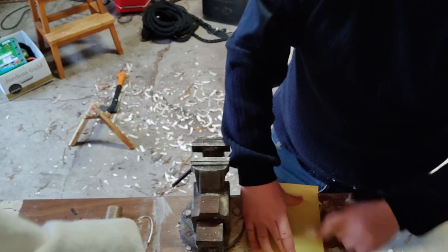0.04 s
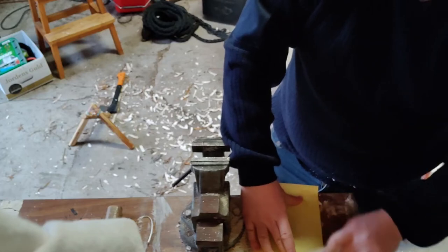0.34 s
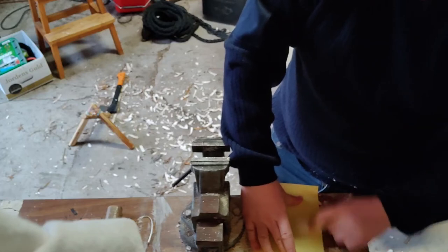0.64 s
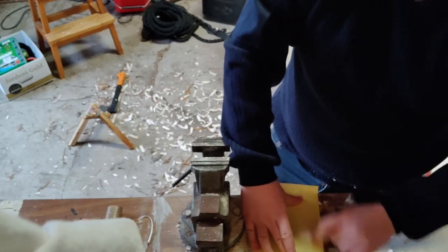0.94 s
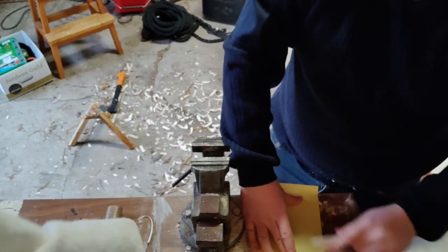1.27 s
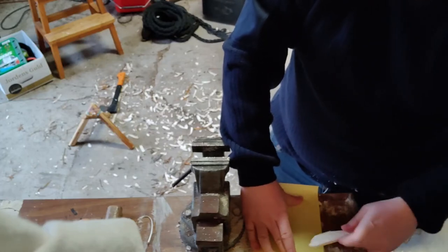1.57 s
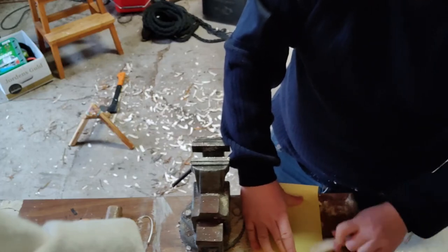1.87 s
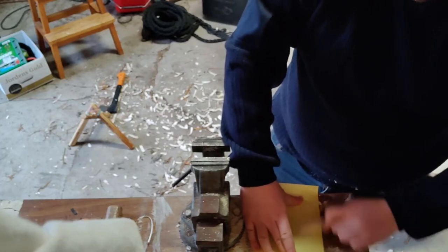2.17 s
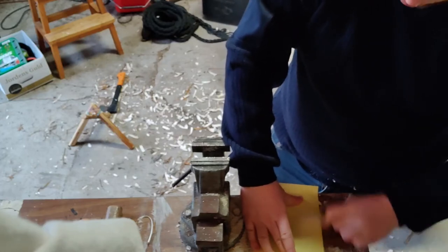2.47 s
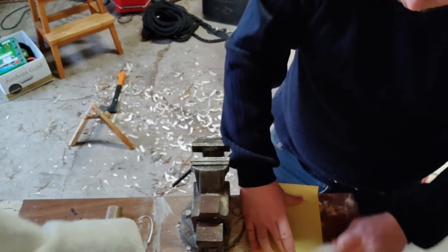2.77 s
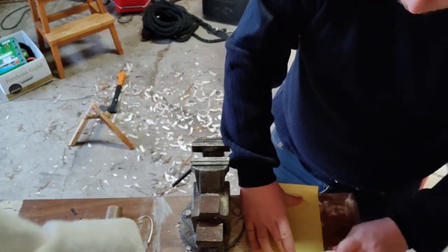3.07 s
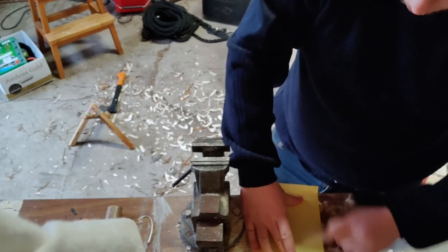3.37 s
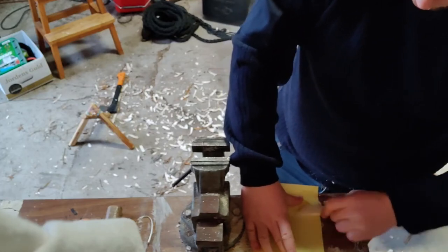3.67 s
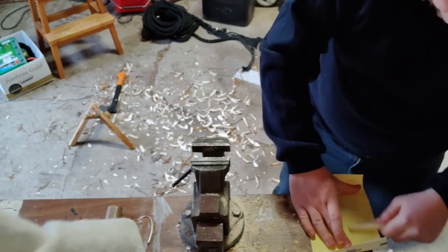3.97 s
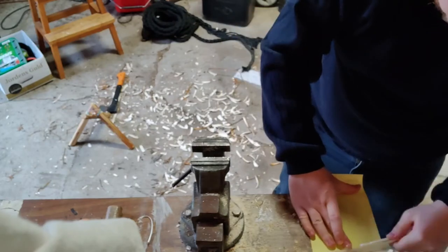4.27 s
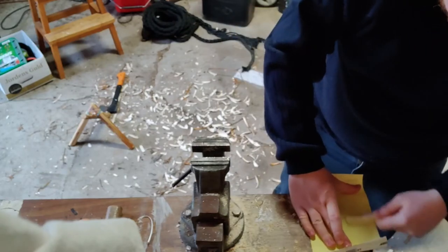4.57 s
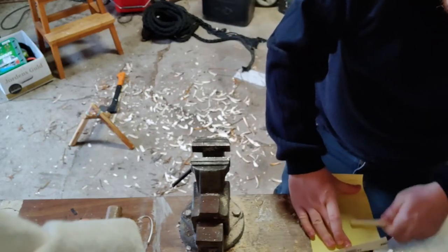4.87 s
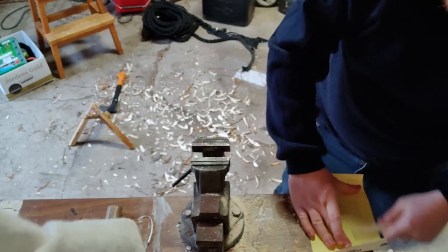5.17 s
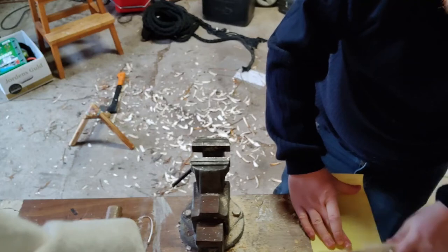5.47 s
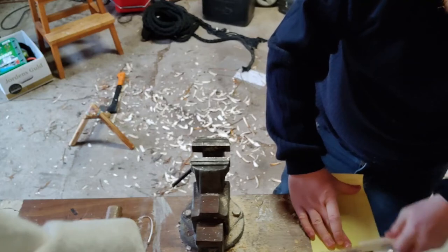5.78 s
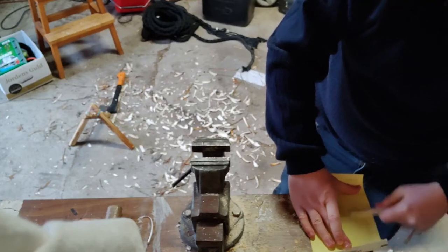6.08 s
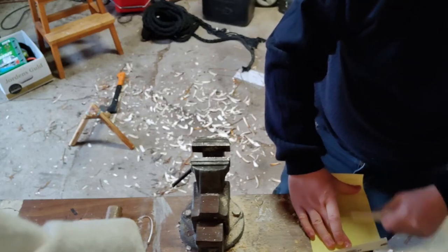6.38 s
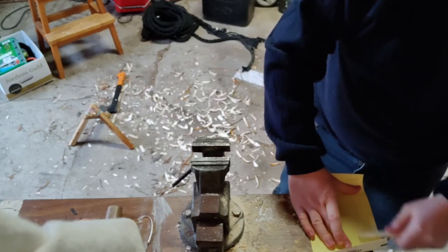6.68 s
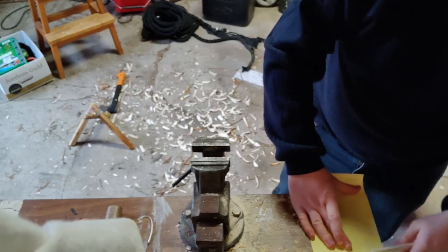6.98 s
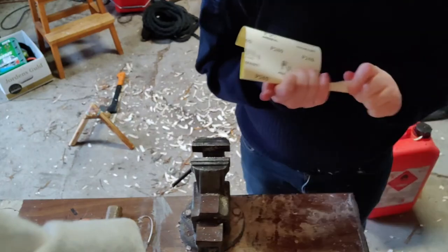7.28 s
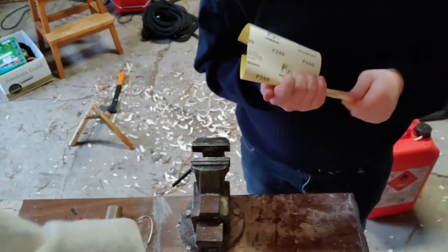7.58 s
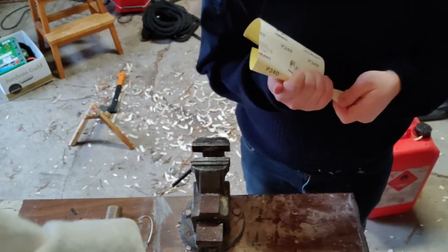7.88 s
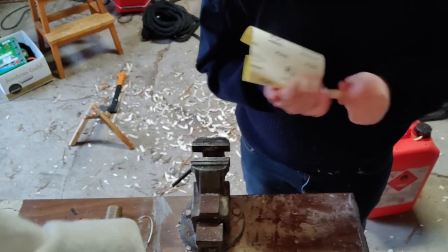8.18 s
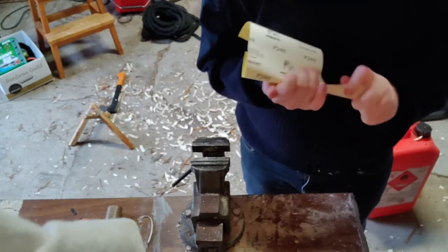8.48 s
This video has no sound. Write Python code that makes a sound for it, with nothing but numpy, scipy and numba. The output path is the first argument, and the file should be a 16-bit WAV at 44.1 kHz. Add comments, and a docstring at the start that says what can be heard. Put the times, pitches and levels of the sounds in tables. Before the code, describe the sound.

Fast, scratchy strokes of a thin wood strip on fine sandpaper, pausing once, then turning raspier, in a small workshop.

```python
"""A bright, scratchy hiss, about eight strokes a second: a thin wood strip sanded by hand in a small workshop.
It is rubbed flat on a sheet on the bench, turned over, run on its edge, then worked in the folded sheet.
Grit ticks merge into the hiss; the strip rasps, snags and rings hollow notes; bench or fist drums below.
The room answers briefly, over faint still air and a hum."""
import sys
import numpy as np
from scipy import signal
from scipy.fft import rfft, irfft
from scipy.io import wavfile
from scipy.ndimage import uniform_filter1d, minimum_filter1d, map_coordinates
from numba import njit

SR = 44100
rng = np.random.default_rng(int(sys.argv[2]) if len(sys.argv) > 2 else 0)


def log_audio(samples):
    """Write samples as a 16-bit WAV file to the path given in sys.argv[1]."""
    # one column per channel
    frames = np.atleast_2d(samples).T
    # limit to full scale, then quantise
    limited = np.clip(frames, -1, 1)
    pcm = np.round(limited * 32767).astype(np.int16)
    wavfile.write(sys.argv[1], SR, pcm)


N = 384993
TIME_S = np.arange(N) / SR
FREQ_HZ = np.maximum(np.fft.rfftfreq(N, 1 / SR), 1)
EDGE_FROM_S, FIST_FROM_S, STROKES_END_S = 3.87, 7.225, 8.745


# Strokes, each row lasting until the next: t/s, hiss level/dB, rasp level/dB, lean (rise over a stroke)/dB
STROKES = [ (-0.013, -27, -49.5, 8.5), (0.122, -25, -48.5, 0), (0.459, -27.5, -50.5, 3.5),
           (1.164, -26.5, -52.5, 0.5), (1.292, -48, -63.5, -42), (1.397, -100, -95, 0),
           (1.56, -70.5, -82, 0), (1.625, -92, -94, -4), (1.835, -73, -79, -16), (1.984, -31, -43, 3),
           (2.061, -63.5, -70, -14), (2.11, -28, -42.5, 11), (2.214, -26, -43, -8), (2.343, -28, -46, -6),
           (2.835, -25, -46.5, 3), (3.802, -28.5, -45.5, -3.5), (4.043, -43, -46, -12),
           (4.084, -22, -46, 12), (4.177, -25, -40, 10), (4.297, -23, -36, -1), (4.42, -22.5, -40, 1),
           (4.535, -28.5, -40, -5), (4.66, -25, -41, -12), (4.775, -29, -41, -6), (4.911, -26.5, -42, -1),
           (5.017, -26.5, -38.5, 3), (5.138, -32.5, -43.5, -5), (5.264, -26, -42, -1),
           (5.384, -26, -40, 1.5), (5.506, -25, -40.5, 16), (5.62, -26.5, -37, 9), (5.744, -29, -42.5, 4),
           (5.887, -29.5, -43.5, -8), (6.009, -26.5, -43.5, 4), (6.133, -23.5, -38, -1),
           (6.259, -23, -37, -2), (6.37, -24.5, -39, -2), (6.496, -23.5, -38, -13.5),
           (6.627, -28.5, -41, -8), (6.742, -29, -40, -19), (6.882, -29, -45, 2), (6.985, -24.5, -41, 19.5),
           (7.101, -26.5, -39.5, 16), (7.228, -30, -40, -16), (7.299, -33.5, -39.5, 8),
           (7.473, -33, -41, 0), (7.634, -33, -43, -11), (7.72, -31, -41, 5), (7.824, -36, -48.5, 8),
           (7.923, -38, -45.5, -1), (8.017, -39.5, -50, 34), (8.094, -31.5, -41, 5),
           (8.205, -32.5, -45, -3), (8.284, -32, -42, 12), (8.394, -32, -42, 3), (8.469, -31, -42, -7),
           (8.572, -34, -42.5, -8), (8.665, -39.5, -47.5, -20)]


def hand(pace_s=0.119, run_over_s=0.3, swing_s=0.0044, push_db=1.5, scatter_db=1.1):
    """Stroke timing and levels per sample; long rows split into runs, pushes shorter and stronger."""
    strokes = []
    ends = [row[0] for row in STROKES[1:]] + [STROKES_END_S]
    for (start, hiss_db, rasp_db, lean_db), end in zip(STROKES, ends):
        count = round((end - start) / pace_s) if end - start > run_over_s else 1
        for k in range(count):
            onset_s = start + (end - start) * k / count - swing_s * (k % 2)
            accent_db = (count > 1) * (push_db * (-1) ** k + scatter_db * rng.standard_normal())
            strokes.append((onset_s, hiss_db + accent_db, rasp_db + accent_db, lean_db))
    starts, hiss_db, rasp_db, lean_db = np.transpose(strokes)
    number = np.maximum(np.searchsorted(starts, TIME_S) - 1, 0)
    since_s = np.abs(TIME_S - starts[number])
    until_s = np.abs(np.append(starts[1:], STROKES_END_S)[number] - TIME_S)
    ramp_db = lean_db[number] * (since_s / (since_s + until_s) - 0.5)
    pressure_db = by_grip(0.3, 0.6, 1.2) * walk(55)
    return dict(number=number, since_s=since_s, until_s=until_s,
                hiss_db=hiss_db[number] + ramp_db + pressure_db,
                rasp_db=rasp_db[number] + 0.7 * ramp_db + pressure_db)


def stroke_gain(motion, level_db, attack_s, release_s, creep):
    """Grit bites, holds and lets go as the hand slows; some creep remains at the turn."""
    bite = np.sin(np.pi / 2 * np.minimum(motion["since_s"] / attack_s, 1)) ** 2
    release = np.minimum(motion["until_s"] / release_s, 1)
    return uniform_filter1d(np.hypot(bite * release, creep) * undb(level_db), size=130)


# Snags: t/s, hiss level/dB, rasp level/dB
SNAGS = [(0.182, -22.5, -57), (0.66, -40, -41), (1.832, -63, -74), (1.988, -28.5, -58), (2.227, -24, -51),
         (3.965, -36, -35), (3.986, -25.5, -36), (4.009, -31, -35), (4.241, -19, -40), (4.318, -19.5, -49),
         (4.43, -38, -54), (4.675, -16, -57), (4.851, -18, -56), (4.921, -22.5, -57), (6.149, -20, -55),
         (6.272, -25, -39), (6.323, -10.5, -40), (6.388, -24, -57), (6.516, -34, -40), (6.637, -39, -38),
         (7.038, -23, -54), (7.173, -15, -36), (7.337, -25, -26.5), (7.35, -40, -24), (7.376, -21.5, -18),
         (7.521, -21, -20), (7.532, -30, -24.5), (7.545, -25.5, -23.5), (7.912, -31.5, -39.5),
         (8.273, -25, -32.5), (8.432, -33, -29), (8.447, -32, -26)]


def snag_gain(layer):
    """Wood catches on the grit and breaks free: millisecond bursts in the "hiss" or "rasp" layer."""
    power = np.zeros(N)
    for start_s, hiss_db, rasp_db in SNAGS:
        span = slice(int(start_s * SR), int((start_s + 0.1) * SR))
        rise_s = 0.0048 if start_s < FIST_FROM_S else 0.0046
        rises = np.maximum(TIME_S[span] - start_s, 0) / rise_s
        peak = undb(hiss_db if layer == "hiss" else rasp_db)
        power[span] += (peak * rises * np.exp(1 - rises)) ** 2
    return np.sqrt(power)


def grit(ticks_per_s, spread_db, chatter_db, chatter_hz, slip_size, slips_per_s=70, slip_s=0.004):
    """Grains tear fibres: dense ticks, a few large, bunched by stick and slip."""
    hits = rng.random(N) < ticks_per_s / SR
    sizes = undb(spread_db * np.minimum(rng.exponential(size=N), 8))
    kicks = (rng.random(N) < slips_per_s / SR) * rng.random(N)
    slips = signal.lfilter([1], [1, -np.exp(-1 / (slip_s * SR))], kicks)
    ticks = hits * sizes * rng.choice([-1, 1], N)
    chatter = undb(chatter_db * walk(chatter_hz))
    return unit_rms(ticks * chatter * (1 + slip_size * slips))


# Hiss spectrum per grip, as heard through the phone microphone, which resonates near 9.5 kHz:
# f/Hz, relative level/dB
FLAT_HISS = [(2650, -47), (4500, -26.5), (5460, -24.5), (7170, -10), (7910, -8), (8880, -1.5), (9500, 3),
             (10600, -6), (11900, -6.5), (14100, -16.5), (15100, -14), (15700, -19)]
EDGE_HISS = [(2650, -51), (4500, -23.5), (5810, -22.5), (7050, -9), (7960, -9.5), (8970, -2), (9550, 2),
             (11400, -12), (15700, -24.5)]
FIST_HISS = [(2650, -30), (4500, -16.5), (5600, -28), (7300, -15.5), (8300, -10), (9550, 1), (10200, -3.5),
             (11200, -14.5), (15700, -20)]


def grit_hiss(motion):
    """Ticks merge into a bright hiss; on the edge fewer grains carry the load, so it crackles."""
    flat = grit(ticks_per_s=16000, spread_db=2.0, chatter_db=0.4, chatter_hz=750, slip_size=0.71)
    edge = grit(ticks_per_s=9000, spread_db=1.5, chatter_db=1.23, chatter_hz=160, slip_size=0.38)
    fist = grit(ticks_per_s=12000, spread_db=2.5, chatter_db=0.8, chatter_hz=1300, slip_size=0.85)
    ticks = by_grip(shaped(flat, FLAT_HISS), shaped(edge, EDGE_HISS), shaped(fist, FIST_HISS))
    # Brightest in mid-stroke; each edge stroke meets the grit at its own angle.
    treble = signal.sosfiltfilt(signal.butter(3, 10700, "high", fs=SR, output="sos"), ticks)
    angle_db = 1.9 * rng.standard_normal(motion["number"].max() + 1)[motion["number"]]
    treble_db = by_grip(1.0, 1.5 + angle_db, -0.92)
    treble_gain = stroke_gain(motion, treble_db, attack_s=0.011, release_s=0.037, creep=0.25)
    friction = stroke_gain(motion, motion["hiss_db"], attack_s=by_grip(0.026, 0.029, 0.022),
                           release_s=by_grip(0.038, 0.054, 0.036), creep=by_grip(0.17, 0.15, 0.29))
    return (ticks + (treble_gain - 1) * treble) * np.hypot(friction, snag_gain("hiss"))


# Broad wood and paper spectrum per grip: f/Hz, relative level/dB
FLAT_RASP = [(240, -34.5), (420, -12.5), (650, -8.5), (850, -10), (1800, -7.5), (2700, -4.5), (5000, -6),
             (9000, -68.5)]
EDGE_RASP = [(240, -48), (400, -3.5), (1250, -1.5), (2700, -8), (3200, -3), (5000, -13), (9000, -80)]
FIST_RASP = [(200, -45), (400, -9), (760, -7.5), (1050, -9.5), (1320, -1.5), (2080, -9.5), (2600, -5.5),
             (3500, -7.5), (5000, -29.5), (9000, -63)]
# Strip resonances per grip: f/Hz, width/Hz, relative level/dB
FLAT_MODES = [(1470, 320, -8.5), (2253, 220, 0.5), (2707, 110, 5)]
EDGE_MODES = [(650, 59, 1), (1901, 50, 2.5), (3040, 97, -0.5)]
FIST_MODES = [(1370, 93, 0.5), (1970, 25, -2.5), (2460, 230, 2)]


def wood_rasp(motion):
    """Strokes and snags drive the woody midrange; in the fold the strip ratchets in fewer jerks."""
    rub = grit(ticks_per_s=5000, spread_db=0.0, chatter_db=0.74, chatter_hz=120, slip_size=0.83)
    ratchet = grit(ticks_per_s=3600, spread_db=1.5, chatter_db=1.8, chatter_hz=150, slip_size=0.85)
    flat = strip_body(rub, FLAT_RASP, FLAT_MODES, ring_db=-0.5, drift=0.01)
    edge = strip_body(rub, EDGE_RASP, EDGE_MODES, ring_db=1.0, drift=0.03)
    fist = strip_body(ratchet, FIST_RASP, FIST_MODES, ring_db=-1.5, drift=0.015)
    friction = stroke_gain(motion, motion["rasp_db"], attack_s=by_grip(0.018, 0.031, 0.021),
                           release_s=by_grip(0.024, 0.046, 0.038), creep=by_grip(0.29, 0.27, 0.26))
    return by_grip(flat, edge, fist) * np.hypot(friction, snag_gain("rasp"))


def strip_body(force, spectrum, modes, ring_db, drift):
    """Strip and paper radiate broadly; a few resonances stand out and wander as the fingers shift."""
    mode_power = sum(undb(db) ** 2 / (1 + (2 * (FREQ_HZ - hz) / width_hz) ** 2) ** 2
                     for hz, width_hz, db in modes)
    wood = causal_filter(force, np.sqrt(spectrum_gain(spectrum) ** 2 + undb(ring_db) ** 2 * mode_power))
    read_index = np.cumsum(1 + drift * walk(14))
    return unit_rms(map_coordinates(wood, [read_index], order=3, mode="mirror"))


# Hollow notes where the edge digs in: centre t/s, f/Hz, level/dB
HOLLOW_NOTES = [(.665, 1650, -48), (1.245, 620, -55), (3.91, 2850, -41.5), (3.985, 700, -53),
                (4.26, 1660, -40.5), (4.36, 1120, -38.5), (4.485, 1410, -36), (4.59, 1105, -36),
                (5.061, 1150, -36), (5.57, 730, -38.5), (5.69, 800, -37), (5.784, 724, -36),
                (6.312, 1000, -37.5), (6.44, 690, -37), (6.655, 1104, -42.5)]


def hollow_notes(motion, half_length_s=0.03, glide_oct_per_s=8.1, q=1.84):
    """Judder rings a strip resonance; it glides with the contact, up on one stroke, down on the next."""
    notes = np.array(HOLLOW_NOTES)
    nearest = np.searchsorted((notes[1:, 0] + notes[:-1, 0]) / 2, TIME_S)
    centre_s, centre_hz, level_db = notes[nearest].T
    offset_s = np.clip(TIME_S - centre_s, -4 * half_length_s, 4 * half_length_s)
    direction = 1 - 2 * (motion["number"] % 2)
    pitch_hz = centre_hz * 2 ** (glide_oct_per_s * direction * offset_s)
    judder = grit(ticks_per_s=3000, spread_db=3.0, chatter_db=1.5, chatter_hz=100, slip_size=0.5)
    first_pass = moving_bandpass(judder, pitch_hz, q) * np.sqrt(pitch_hz)
    ring = unit_rms(moving_bandpass(first_pass, pitch_hz, q))
    return ring * undb(level_db) * np.exp(-(offset_s / half_length_s) ** 2)


# Drumming spectra of bench and fist: f/Hz, relative level/dB
BENCH_DRUM = [(30, -42), (60, -27.5), (95, -7.5), (150, -4), (200, -4), (245, 3.5), (330, 0.5), (420, -8),
              (560, -13), (900, -56.5)]
FIST_DRUM = [(40, -38), (110, -25), (220, -10), (330, 2), (430, -3.5), (560, -11), (900, -65)]
# Drumming contour, added to the rasp level: t/s, relative level/dB
DRUM_CONTOUR = [(0, -11), (1.9, -6), (2.15, -18), (2.5, -9.5), (3.6, -5.5), (4.0, -10), (4.25, -10),
                (4.45, -11), (4.78, -6), (5.05, -16), (5.65, -4), (5.85, -8.5), (6.2, -5.5), (6.85, -9.5),
                (7.15, -9.5), (7.35, -15), (8.6, -10)]


def drumming(motion):
    """Uneven friction drums on the bench or in the cupped fist."""
    rub = grit(ticks_per_s=1500, spread_db=2.0, chatter_db=by_grip(2.26, 4.75, 4.1),
               chatter_hz=60, slip_size=0.9)
    bench = undb(-1.5) * shaped(rub, BENCH_DRUM)
    fist = undb(-1.0) * shaped(rub, FIST_DRUM)
    drum_db = motion["rasp_db"] + np.interp(TIME_S, *np.transpose(DRUM_CONTOUR))
    friction = stroke_gain(motion, drum_db, attack_s=0.023, release_s=0.04, creep=0.28)
    return by_grip(bench, bench, fist) * np.hypot(friction, undb(-14) * snag_gain("rasp"))


# Knocks on the bench: t/s, peak level/dB, f/Hz
BUMPS = [(2.018, -37, 280), (4.243, -33, 239), (4.744, -34.5, 310), (4.765, -35, 243), (5.685, -32, 344),
         (6.278, -33, 233), (6.519, -29, 224), (7.168, -29.5, 258)]


def bench_bumps(rise_s=0.0037, t60_s=0.057):
    """A soft knock of the strip rings one low note of the bench top."""
    out = np.zeros(N)
    age_s = np.arange(SR // 4) / SR
    envelope = (1 - np.exp(-age_s / rise_s)) * undb(-60 * age_s / t60_s)
    for start_s, peak_db, hz in BUMPS:
        ring = envelope * np.sin(2 * np.pi * hz * age_s)
        start = int(start_s * SR)
        out[start:start + len(ring)] += undb(peak_db) * ring / np.abs(ring).max()
    return out


# Spectra of the shaking bench and its rocking frame: f/Hz, relative level/dB
BENCH_SHAKE = [(25, -33.5), (50, -21.5), (75, -3.5), (96, -0.5), (130, -9), (200, -11.5), (400, -32)]
FRAME_ROCK = [(20, -6), (50, -5), (110, -9), (300, -43)]


def bench_rumble(motion):
    """The working arm shakes the bench and, mainly with the strip flat, rocks the heavy frame."""
    effort = np.tanh(uniform_filter1d(undb(motion["hiss_db"]), size=4000) / undb(-34))
    shake = undb(by_grip(-62, -64, -65)) * shaped(rng.standard_normal(N), BENCH_SHAKE)
    rock = undb(by_grip(-72.5, -90, -94)) * shaped(rng.standard_normal(N), FRAME_ROCK)
    return effort * (shake + rock)


def room_echo(x, t60_s, first_s):
    """A cluttered workshop: scattered early echoes thicken into a short tail."""
    age_s = np.arange(SR // 2) / SR
    echoes = rng.standard_normal(len(age_s)) * (rng.random(len(age_s)) < 0.03 + 10 * age_s)
    response = echoes * (age_s > first_s) * undb(-60 * age_s / t60_s)
    return signal.fftconvolve(x, response / np.linalg.norm(response))[:N]


# Still room spectrum: f/Hz, relative level/dB
STILL_ROOM = [(15, -45), (25, -17), (106, -6), (335, -12.5), (2780, -28.5), (5280, -37.5), (9270, -29),
              (15000, -35)]


def room_tone(air_db=-78.5, hum_db=-82, hum_hz=98):
    """Steady faint noise and a wavering hum."""
    air = undb(air_db) * shaped(rng.standard_normal(N), STILL_ROOM)
    hum = undb(hum_db + 2 * walk(6)) * unit_rms(np.sin(2 * np.pi * hum_hz * TIME_S))
    return air + hum


def by_grip(flat, edge, fist):
    """Per sample, the value for the current grip."""
    return np.where(TIME_S < EDGE_FROM_S, flat, np.where(TIME_S < FIST_FROM_S, edge, fist))


def undb(db):
    """Decibels to gain."""
    return 10 ** (np.asarray(db) / 20)


def unit_rms(x):
    """Scale to rms 1."""
    return x / np.sqrt(np.mean(x ** 2))


def walk(rate_hz):
    """Random line of rms 1, with rate_hz knots a second."""
    knots = rng.standard_normal(N // 20)
    return unit_rms(np.interp(TIME_S * rate_hz, np.arange(len(knots)), knots))


def spectrum_gain(spectrum):
    """Gain per FFT bin from (f/Hz, level/dB) points."""
    hz, db = np.transpose(spectrum)
    return undb(np.interp(np.log(FREQ_HZ), np.log(hz), db))


def causal_filter(x, gain):
    """Minimum-phase filter: each tick rings after it is struck."""
    cepstrum = irfft(np.log(gain + 1e-5), N)
    cepstrum[1:N // 2] *= 2
    cepstrum[N // 2:] = 0
    response = irfft(np.exp(rfft(cepstrum)), N)[:SR // 10]
    return signal.fftconvolve(x, response)[:N]


def shaped(x, spectrum):
    """Filter by a spectrum table, then scale to rms 1."""
    return unit_rms(causal_filter(x, spectrum_gain(spectrum)))


@njit
def moving_bandpass(x, hz, q):
    """State-variable band-pass; noise comes out equally strong at any pitch."""
    y, band, low = np.empty(len(x)), 0., 0.
    for i in range(len(x)):
        g = np.tan(np.pi * hz[i] / SR)
        v = (band + g * (x[i] - low)) / (1 + g * (g + 1 / q))
        band, low = 2 * v - band, low + 2 * g * v
        y[i] = v / np.sqrt(g)
    return y


def scene():
    """Grit, wood, bench and room, the same in both ears."""
    motion = hand()
    hiss = grit_hiss(motion)
    wood = wood_rasp(motion) + hollow_notes(motion)
    bass = drumming(motion) + bench_bumps() + bench_rumble(motion)
    send = undb(by_grip(0, 0, 2.6))  # lifted off the bench, more sound reaches the room
    hiss_echo = undb(-12.5) * room_echo(send * hiss, t60_s=0.17, first_s=0.003)
    body_echo = undb(-8.5) * room_echo(send * wood + bass, t60_s=0.16, first_s=0.0026)
    return np.tile(hiss + wood + bass + hiss_echo + body_echo + room_tone(), (2, 1))


def record(dry, notch_hz=7930, ceiling=0.42, cutoff_hz=15850):
    """Close phone microphone: narrow treble dip, 1 ms peak limiter, steep low-pass."""
    notched = signal.lfilter(*signal.iirnotch(notch_hz, Q=45, fs=SR), dry)
    heard = 0.25 * dry + 0.75 * notched
    max_gain = np.minimum(1, ceiling / (np.abs(heard) + 1e-9))
    limiter_gain = uniform_filter1d(minimum_filter1d(max_gain, size=45), size=45)
    lowpass = signal.ellip(12, 0.2, 75, cutoff_hz, fs=SR, output="sos")
    return signal.sosfilt(lowpass, limiter_gain * heard)


dry = scene()
out = record(dry)
log_audio(out)
```